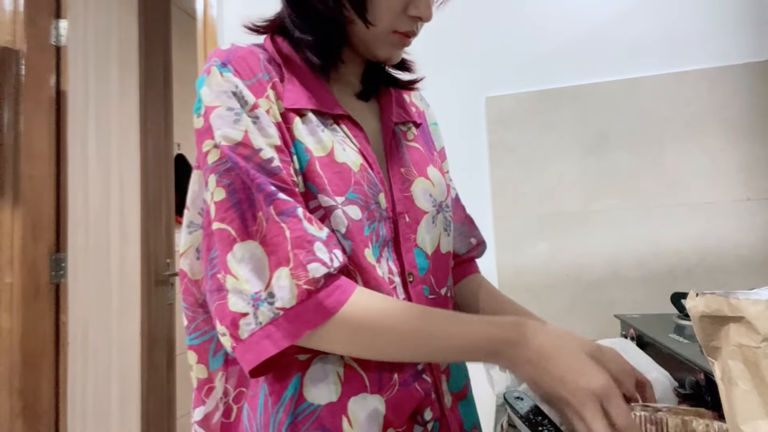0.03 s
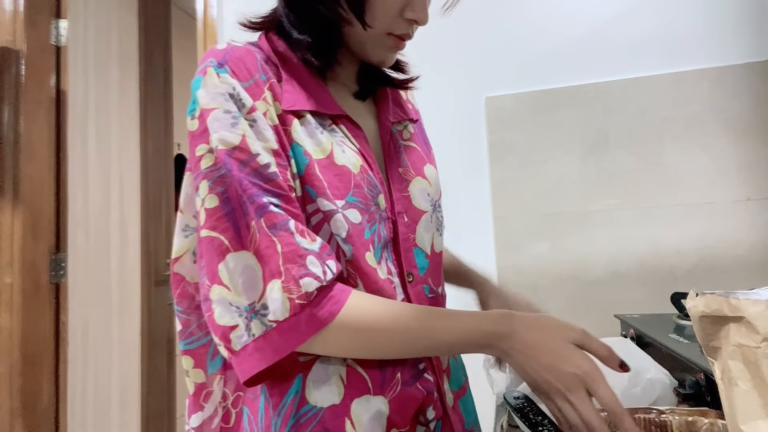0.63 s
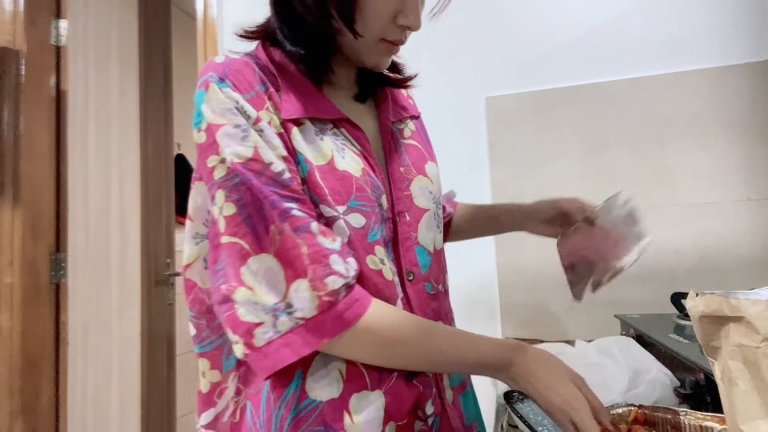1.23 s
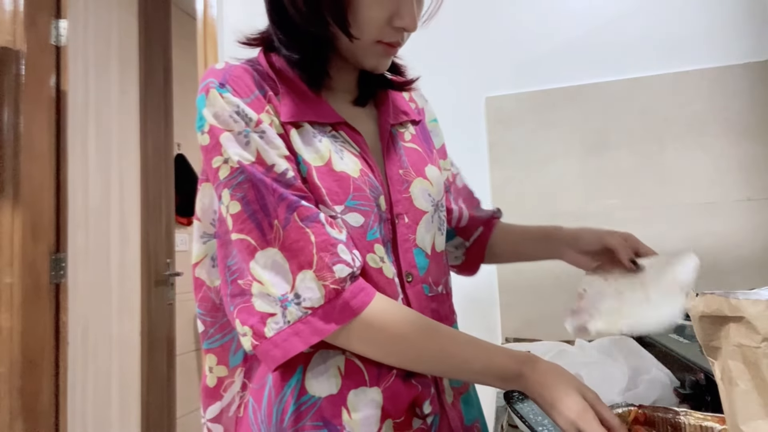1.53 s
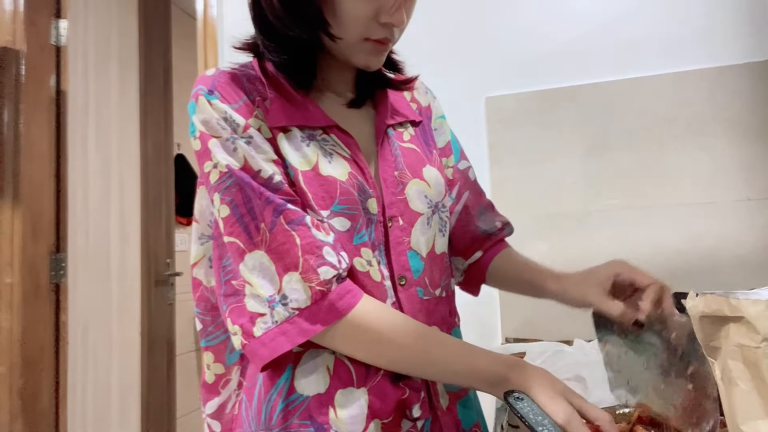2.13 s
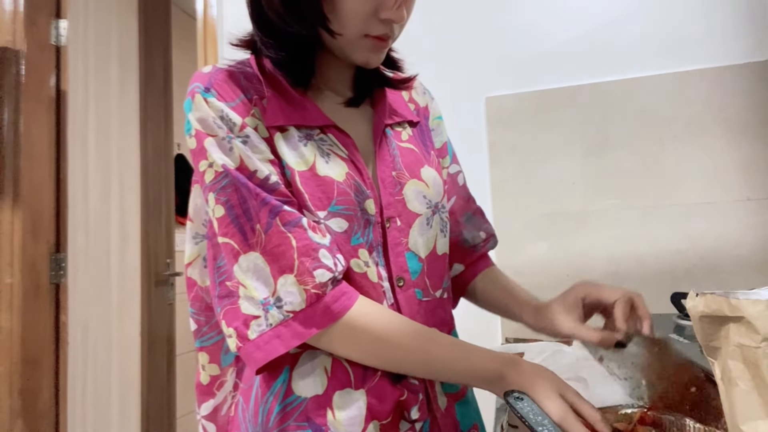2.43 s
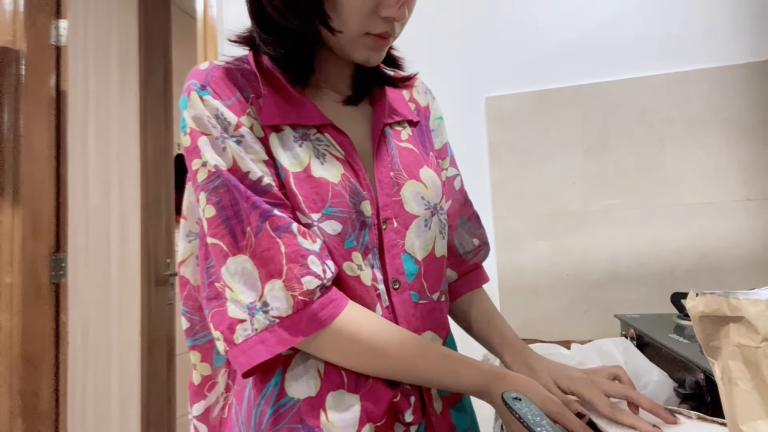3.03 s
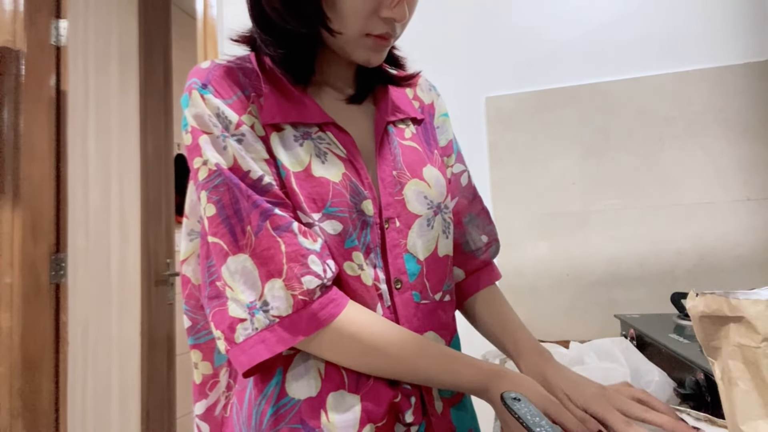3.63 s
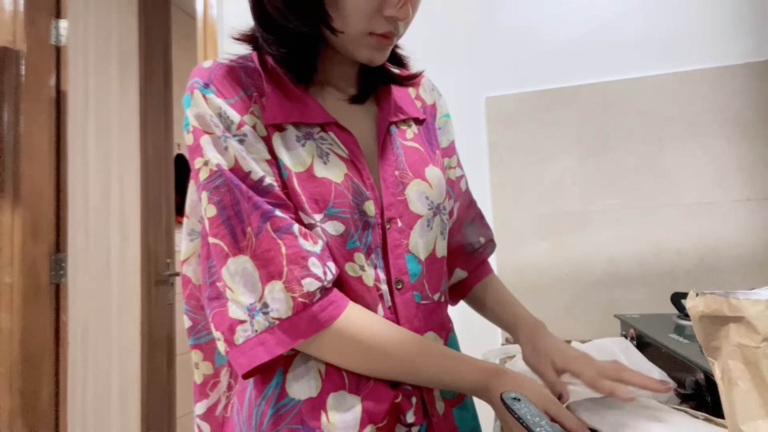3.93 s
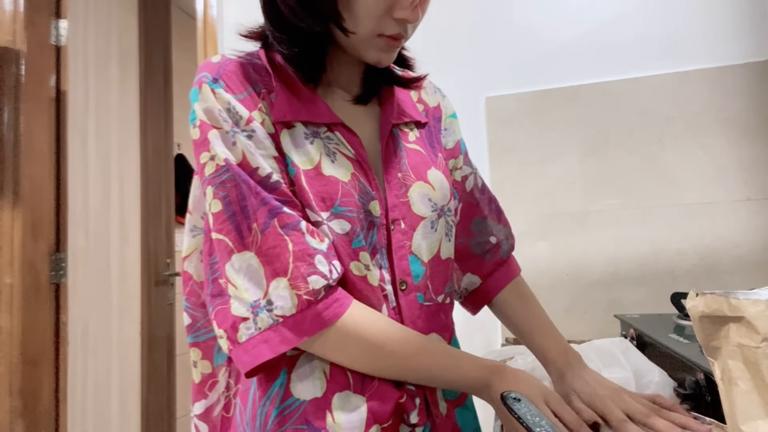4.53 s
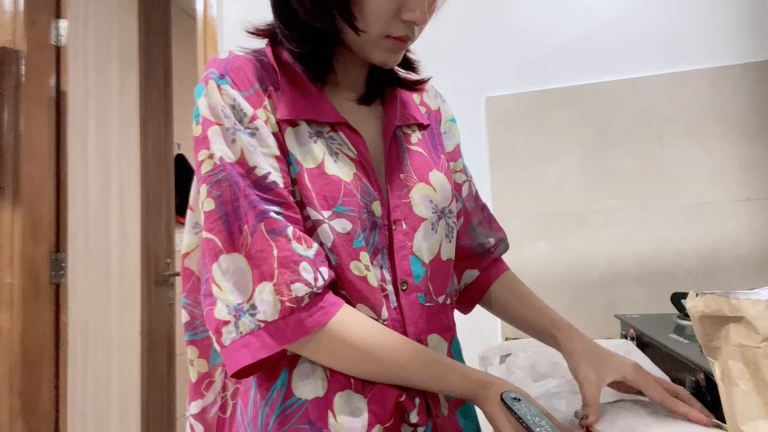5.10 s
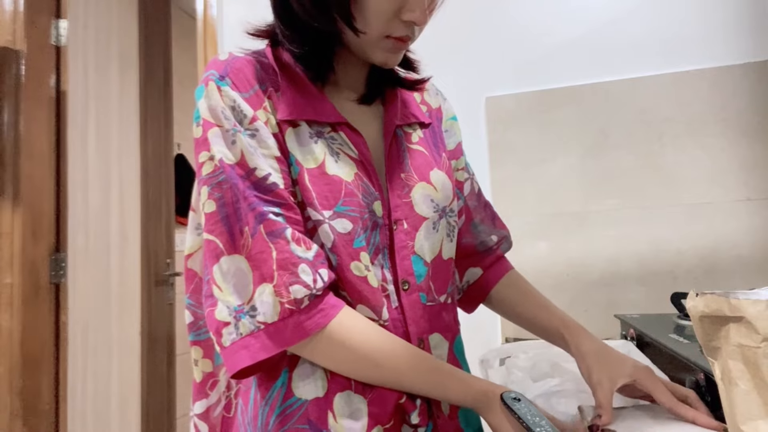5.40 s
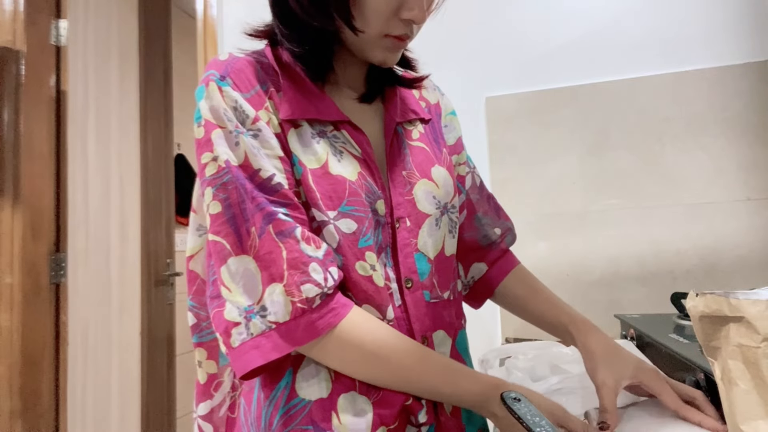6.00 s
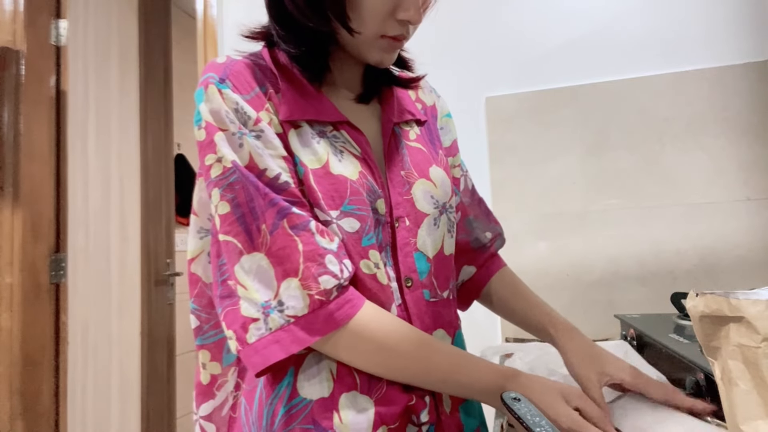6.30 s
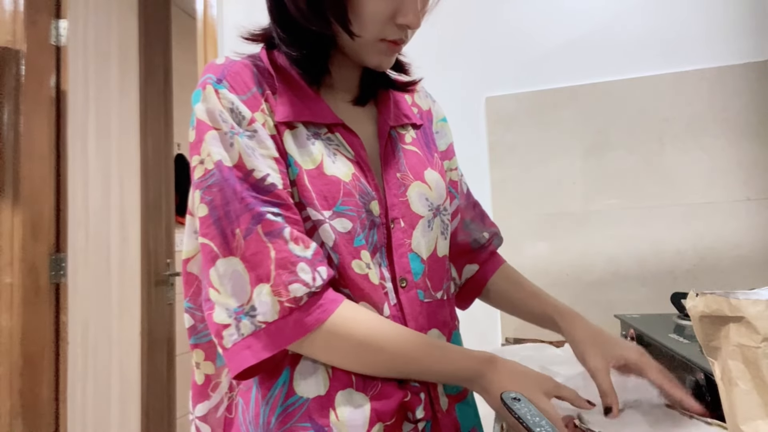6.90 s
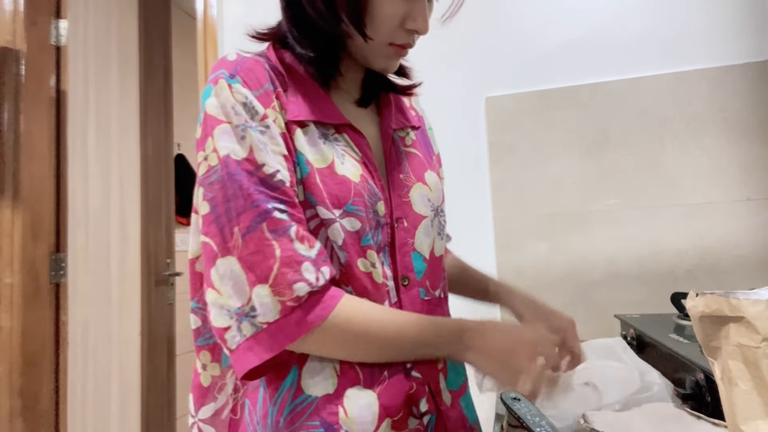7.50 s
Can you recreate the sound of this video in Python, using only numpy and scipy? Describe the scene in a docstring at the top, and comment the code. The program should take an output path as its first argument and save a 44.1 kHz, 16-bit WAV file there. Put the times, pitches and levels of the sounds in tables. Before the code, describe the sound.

In a small kitchen, an appliance motor hums faintly while someone covers a foil food tray nearby. First comes a light crackle of plastic being pulled, then a quieter stretch of faint ticks. The foil starts to snap and crackle under the fingers, the rim folds and creaks briefly, and the hollow tray pops and bumps the counter. One more plastic rustle swells at the close.

```python
"""An aluminium foil tray snaps, pops and knocks on the counter as someone presses a plastic sheet onto it.
First the sheet is peeled off its wrapping, and its tiny creases flip with a crinkle. Under the fingers
small patches of foil buckle in bursts of clicks, the rim folds and creaks, and the hollow tray rings.
The small kitchen echoes briefly, and an appliance's motor hums and whines faintly underneath."""
import sys
import numpy as np
from scipy import signal
from scipy.fft import rfft, irfft
from scipy.io import wavfile
from scipy.ndimage import uniform_filter1d

SR = 44100
rng = np.random.default_rng(int(sys.argv[2]) if len(sys.argv) > 2 else 0)


def generate_wav(sig):
    """Save sig (samples, or channels by samples) to the path in sys.argv[1] as 16-bit PCM at SR."""
    pcm = np.round(np.clip(np.atleast_2d(sig).T, -1, 1) * 32767).astype(np.int16)
    wavfile.write(sys.argv[1], SR, pcm)


N = 341775
TIME = np.arange(N) / SR

# Event levels are set before each source's own gain. A "colour" is how strong each pitch is in a sound.
# small patches of foil buckling: time_s, level_db, pitch_hz
SNAPS = [(0.2701, -13.5, 9900), (1.568, -35, 6300), (2.9237, -12, 8700), (3.3802, -8.5, 14000),
         (4.053, -24.5, 8200), (4.5062, -13, 7350), (4.574, -19, 9100), (4.9523, -15, 6800),
         (5.1432, -21.5, 7150), (5.445, -22, 8400), (5.855, -19.5, 6800), (6.4112, -20.5, 9000),
         (6.679, -23.5, 7600), (6.7212, -19, 8800), (6.872, -19, 7250), (7.3416, -13.5, 7700)]
# the rim folding over: time_s, level_db, pitch_hz
FOLDS = [(1.709, -28.5, 4270), (3.366, -14.5, 3600), (4.2435, -20.5, 4460), (4.299, -22, 3860),
         (4.3454, -22.5, 3480), (6.2698, -26.5, 3740)]
# the tray bumping the counter or being tapped: start_s, ring_db, centre_hz, centre_boost_db, crack_db
KNOCKS = [(0.144, -34, 1800, 17, -38), (.403, -34.5, 1400, 8, -27.5), (3.156, -21.5, 806, 3.5, -24),
          (3.3811, -9.5, 1000, 1.5, -9), (3.7958, -22.5, 520, 11.5, -26), (4.339, -25.5, 334, 4, -43),
          (4.711, -28.5, 430, 10, -26), (5.277, -37, 1200, 1, -26.5), (5.334, -36.5, 330, 0, -30),
          (6.195, -30.5, 1710, 4, -22), (6.271, -29, 1110, 11, -48), (6.399, -27.5, 342, 10, -42),
          (6.4598, -13, 370, 4, -13.5), (6.892, -32.5, 880, 7, -28), (7.049, -34, 1270, 4, -30)]
# the tones the tray rings with: pitch_hz, level_db, ring_s (time to fade by 60 dB)
TRAY_TONES = [(188, -8, 0.044), (290, -3, 0.034), (347.6, -6, 0.055), (477, -11.5, 0.047),
              (616, -3.5, 0.066), (692, -7, 0.053), (828, -6, 0.023), (984, -2, 0.041), (1130, 3, 0.028),
              (1279, 2.5, 0.041), (1710, -2, 0.028)]
# the tray's floor flipping through: time_s, level_db, pitch_hz, rise_s, fade_s
POPS = [(3.385, -14, 1051, 0.00048, 0.0023), (6.466, -10, 663, 0.0015, .0018)]
# the rim scraping under pressure: start_s, length_s, level_db
CREAKS = [(4.162, 0.059, -45), (4.285, 0.041, -36)]
# pulls on the plastic sheet: start_s, length_s, level_db, swell_db_per_s
PULLS = [(-.02, 0.062, -39, -10), (0.343, 0.021, -43.5, -4), (0.673, 0.076, -37.5, 0),
         (0.772, 0.3, -39, 10), (1.157, 0.034, -40.5, 0), (7.47, 0.38, -37, 31)]
# large creases of the plastic flipping: start_s, level_db
CREASES = [(.685, -39), (.7907, -26), (0.936, -29), (.964, -26), (2.152, -48), (3.989, -33), (7.488, -22),
           (1.01, -26), (1.08, -24), (4.283, -30), (7.653, -22)]
# fingers pressing the sheet onto the tray: start_s, length_s, crinkle_db, rub_db, rub_centre_hz
PRESSES = [(0.347, 0.058, -34.5, -42, 1200), (1.82, 0.14, -49, -61, 1200), (2.209, 0.042, -40.5, -55, 1200),
           (2.396, 0.23, -47.5, -74, 985), (2.547, 0.1, -38, -50, 1080), (2.727, 0.11, -39, -43.5, 1300),
           (2.86, 0.17, -41, -46, 1170), (3.178, 0.56, -43.5, -47.5, 880), (3.344, 0.054, -21, -39.5, 1300),
           (3.863, 0.4, -43.5, -60, 800), (4.142, 0.097, -42, -45.5, 1210), (4.258, 0.1, -42, -40, 1080),
           (4.353, 0.3, -45, -57, 700), (4.643, 0.13, -38, -45, 483), (4.854, 0.24, -35.5, -51.5, 664),
           (5.092, 0.15, -37, -46.5, 720), (5.415, 0.079, -37.5, -46.5, 615),
           (5.843, 0.23, -42.5, -46, 700), (6.282, 0.18, -36, -50.5, 760), (6.722, 0.087, -36.5, -62, 900),
           (6.98, 0.14, -45, -49.5, 1530)]
# colour of cracking foil: pitch_hz, level_db
FOIL_COLOUR = [(300, -24), (1200, -9), (2700, -14.5), (3900, -9), (5400, -11), (8400, 0.5), (10500, -3),
               (12400, -7), (14800, -1), (17000, -29)]
# colour of the creaking rim: pitch_hz, level_db
CREAK_COLOUR = [(600, -10), (1800, -6), (2900, -3), (3900, 10), (5500, -5), (12000, -21)]
# colour of crinkling plastic: pitch_hz, level_db
PLASTIC_COLOUR = [(200, -18), (700, -7.5), (1400, -11), (3200, -10.5), (5400, -6), (7000, -1.5),
                  (8700, 3.5), (11000, -1.5), (12200, -7), (14200, 4), (17000, -5)]
# colour of the hollow tray when it is rubbed or rattles: pitch_hz, level_db
TRAY_COLOUR = [(120, -36.5), (300, 4), (650, 5), (850, -4), (1280, 6), (1600, -4), (2300, -1), (2900, -7),
               (3900, -4), (6000, -7), (12000, -60)]
# colour of the rushing air: pitch_hz, level_db
AIR_COLOUR = [(20, -18), (33, -23), (47, -3), (70, -10), (110, -1.5), (170, -9), (400, -12), (550, -19),
              (1100, -21.5), (1700, -27.5), (5500, -33), (8800, -25.5), (12200, -33.5), (14500, -29)]
# the motor's strong tones: multiple_of_motor_rate, level_db
HUM_TONES = [(1, -59), (4, -59), (12, -68), (38, -72), (52, -71), (54, -66.5), (60, -74), (81, -66.5)]
# the changing level of the deep hum at twice the motor rate: time_s, level_db
DEEP_HUM = [(0.0, -50), (1.01, -45.5), (1.64, -50), (1.68, -82), (1.96, -52), (2.68, -44.5), (3.84, -53),
            (4.25, -45.5), (5.03, -51.5), (5.29, -47), (7.75, -47)]
# bands where the appliance's casing buzzes with weak tones: centre_hz, width_octaves, level_db
WHINE_BANDS = [(2670, 0.036, -72.5), (4190, 0.12, -74.5)]
# the kitchen's echo: pitch_hz, ring_s (time to fade by 60 dB)
ROOM_ECHO = [(150, 0.32), (2500, 0.37), (16000, 0.25)]


def foil_snaps(gain_db=-9, lead_db=-38, lead_s=0.014, burst_s=0.018, rebound_s=0.003, rebound_db=2.5):
    """Buckling foil creaks, gives way in a burst of clicks and cracks again as it springs back."""
    out, t = np.zeros(N), np.arange(-2048, 2048) / SR
    strain = np.where(t < 0, amp(lead_db) * np.exp(-abs(t) / lead_s), amp(-60 * abs(t) / burst_s))
    strain += (t > rebound_s) * amp(rebound_db - 60 * abs(t - rebound_s) / burst_s)

    def buckle(s, db, **tone):
        add(out, s + t[0], amp(db + gain_db) * crack(FOIL_COLOUR, strain, **tone))

    for s, db, hz in SNAPS:
        bright_hz = 8900 * 2 ** (0.2 * (db + 20))  # a harder snap is brighter
        buckle(s, db, centre_hz=bright_hz, boost_db=11, ping_hz=hz, ping_db=5)
    for s, db, hz in FOLDS:
        buckle(s, db, centre_hz=4130, boost_db=8, ping_hz=hz, ping_db=10.5)
    for s, *_, db in KNOCKS:  # a knock also cracks the rim, which pings faintly
        buckle(s, db, centre_hz=3430, boost_db=0, ping_hz=3430, ping_db=4.5)
    return out


def tray_knocks(gain_db=-8, octaves=0.81, rattle_s=0.043, rise_s=0.0035):
    """A knock or a fold rings the tray, muffled by the food in it; the rim rattles briefly."""
    out, t = np.zeros(N), np.arange(SR // 5) / SR
    tone_hz, tone_db, ring_s = np.transpose(TRAY_TONES)[:, :, None]
    fold_blows = [(s, db - 13, 1170, 8) for s, db, _ in FOLDS]  # a fold rings it only a little
    for s, db, centre_hz, boost_db, *_ in KNOCKS + fold_blows:
        phase, bend = rng.random((2, len(TRAY_TONES), 1))
        bent_hz = tone_hz * (1 + 0.084 * (bend - .5))  # the grip bends the thin walls
        waves = np.sin(2 * np.pi * (bent_hz * t + phase))
        ring = (waves * amp(tone_db + boost_db * bell(tone_hz, centre_hz, octaves) - 60 * t / ring_s)).sum(0)
        rim_clicks = clicks(len(t), per_s=6000, spread_db=1.1) * amp(-60 * t / rattle_s)
        rattle = coloured(rim_clicks, TRAY_COLOUR, boost(boost_db, centre_hz, octaves))
        blow = (peaked(ring) + peaked(rattle)) * (1 - np.exp(-t / rise_s))
        add(out, s, amp(db + gain_db) * peaked(blow))
    return out


def tray_pops(sag_octaves_per_s=25):
    """The tray's floor flips with a hollow pop; its pitch sags as the tension goes."""
    out, t = np.zeros(N), np.arange(-1024, 1024) / SR
    for s, db, hz, rise_s, fade_s in POPS:
        pitch_hz = hz * 2 ** (-sag_octaves_per_s * t)
        swing = np.sin(2 * np.pi * np.cumsum(pitch_hz) / SR)
        loudness = np.exp(-abs(t) / np.where(t < 0, rise_s, fade_s))
        add(out, s + t[0], amp(db) * swing * loudness)
    return out


def rim_creaks():
    """Pressed hard, the rim sticks and slips with a nasal scrape."""
    slips = rustle(CREAK_COLOUR, per_s=2300, spread_db=3, clump_db=5, clump_hz=70,
                   low_hz=2000, high_hz=4500)
    return sum(amp(db) * pressure(s, length) for s, length, db in CREAKS) * slips


def sheet_peeling(fizz_db=0.5, pings_db=-8):
    """Pulled plastic gives a bright fizz of creases and pings, louder the tighter the pull."""
    pull = np.zeros(N)
    for s, length, db, db_per_s in PULLS:
        swell_db = db_per_s * np.clip(TIME - s, 0, length)
        pull += amp(db + swell_db) * held(s, length, rise_s=0.012, fade_s=0.047)
    fizz = rustle(PLASTIC_COLOUR, per_s=3200, spread_db=-1, clump_db=2.5, clump_hz=35)
    return pull * (amp(fizz_db) * fizz + amp(pings_db) * sheet_pings())


def sheet_pings(ring_s=0.006, low_hz=1500, high_hz=12000, count=28):
    """Small tight patches of plastic ring briefly, each at its own pitch."""
    out, t = np.zeros(N), np.arange(1024) / SR
    pitches = low_hz * (high_hz / low_hz) ** ((np.arange(count) + rng.random(count)) / count)
    rings = np.sin(2 * np.pi * pitches[:, None] * t) * amp(-60 * t / ring_s)
    flips = clicks(N, per_s=450, spread_db=3)
    patch = rng.integers(0, count, N)
    for at in np.flatnonzero(flips):
        add(out, at / SR, flips[at] * rings[patch[at]])
    return unit(coloured(out, PLASTIC_COLOUR))


def sheet_creases(gain_db=-5, burst_s=0.043):
    """The larger creases of the plastic flip one by one, each at its own pitch."""
    out, strain = np.zeros(N), amp(-60 * np.arange(2048) / SR / burst_s)
    for s, db in CREASES:
        hz = rng.uniform(3500, 10500)
        flip = crack(PLASTIC_COLOUR, strain, centre_hz=hz, boost_db=3, ping_hz=hz, ping_db=5)
        add(out, s, amp(db + gain_db) * flip)
    return out


def crinkle(hold_from_s=2.9, hold_db=-68, settle_db=-25.5):
    """Sheet and foil crackle under each press, as they settle after a snap, and faintly while held."""
    power = amp(hold_db) ** 2 * (TIME > hold_from_s)
    power += sum((amp(db) * pressure(s, length)) ** 2 for s, length, db, *_ in PRESSES)
    for s, db, _ in SNAPS:
        power += (amp(db + settle_db) * held(s, length_s=0.026, rise_s=0.026, fade_s=0.027)) ** 2
    return np.sqrt(power) * rustle(PLASTIC_COLOUR, per_s=2000, spread_db=0.5, clump_db=5, clump_hz=30)


def finger_rubs(boost_db=9, octaves=0.54):
    """Small slips of the fingers sound through the hollow tray; the spot pressed sets their pitch."""
    slips = rustle(TRAY_COLOUR, per_s=2200, spread_db=2, clump_db=7, clump_hz=48, low_hz=317, high_hz=1200)
    out = np.zeros(N)
    for s, length, _, db, centre_hz in PRESSES:
        part = slice(round(s * SR), round((s + length) * SR))
        spectrum = rfft(slips[part])
        hz = np.linspace(0, SR / 2, len(spectrum))
        rub = irfft(spectrum * amp(boost_db * bell(hz, centre_hz, octaves)), len(slips[part]))
        add(out, s, amp(db) * pressure(s, length)[part] * unit(rub))
    return out


def sheet_ticks(start_s=1.4, per_s=34, gain_db=-46.5, tick_s=0.022, count=8):
    """Single creases flip at random with faint ticks while the sheet is handled."""
    out, t = np.zeros(N), np.arange(2048) / SR
    for centre_hz in np.geomspace(6500, 11500, count):
        burst = clicks(len(t), per_s=10000, spread_db=5.2) * amp(-60 * t / tick_s)
        tick = coloured(burst, PLASTIC_COLOUR, boost(8, centre_hz, octaves=0.81))
        flips = clicks(N, per_s / count, spread_db=1.5) * (TIME > start_s)
        out += signal.oaconvolve(flips, peaked(tick))[:N]
    return amp(gain_db) * out


def kitchen(sound, echo_db, gap_s=0.0023):
    """Adds the dense echo of tiled walls; low and high pitches die away at their own speeds."""
    bounces = rng.standard_normal(SR // 2) * (rng.random(SR // 2) < 5000 / SR)
    hz, t, bands = signal.stft(bounces, SR, nperseg=256)
    fade = amp(-60 * t / look_up(ROOM_ECHO, hz)[:, None])
    echo = signal.istft(bands * fade, SR, nperseg=256)[1]
    echo *= np.clip(np.arange(len(echo)) / SR / gap_s - 1, 0, 1)  # fades in after a short gap
    return sound + amp(echo_db) * signal.oaconvolve(sound, echo / np.linalg.norm(echo))[:N]


def appliance(motor_hz=49.055, waver_hz=0.035, air_db=-45.5):
    """A motor hums and buzzes at whole multiples of its turning rate, over a soft rush of air."""
    air_gain = amp(look_up(AIR_COLOUR, np.fft.rfftfreq(N, 1 / SR)))
    air_level = amp(air_db + 0.7 * drift(6))
    air = air_level * unit(irfft(rfft(rng.standard_normal(N)) * air_gain, N))
    angle = 2 * np.pi * np.cumsum(motor_hz + waver_hz * drift(4.9)) / SR
    hum = [(k, amp(db + drift(12))) for k, db in HUM_TONES]
    hum.append((2, amp(np.interp(TIME, *np.transpose(DEEP_HUM)))))
    whine = [(k, sum(amp(db) * bell(k * motor_hz, hz, width) for hz, width, db in WHINE_BANDS))
             for k in [*range(51, 58), *range(77, 94)] if k not in dict(HUM_TONES)]
    motor = sum(gain * np.sin(k * angle + 2 * np.pi * rng.random()) for k, gain in hum + whine)
    return air + np.sqrt(2) * motor


def crack(colour, strain, centre_hz, boost_db, ping_hz, ping_db):
    """A burst of clicks as loud as the strain, with a broad boost and one narrow ringing pitch."""
    extra_db = boost(boost_db, centre_hz, octaves=1) + boost(ping_db, ping_hz, octaves=0.073)
    burst = clicks(len(strain), per_s=13000, spread_db=3.1) * strain
    return peaked(coloured(burst, colour, extra_db))


def rustle(colour, per_s, spread_db, clump_db, clump_hz, low_hz=3000, high_hz=15000, count=6):
    """Clumps of clicks, shared among creases that each favour their own pitch."""
    clumps = amp(clump_db * np.clip(drift(clump_hz), -2, 2))
    crackle = np.zeros(N)
    for centre_hz in np.geomspace(low_hz, high_hz, count):
        flips = clicks(N, per_s / count, spread_db) * clumps
        crackle += coloured(flips, colour, boost(6, centre_hz, octaves=0.23))
    # even out the level, so random clumps do not make one stroke louder than another
    power = uniform_filter1d(uniform_filter1d(crackle ** 2, 4096), 2048)
    return crackle / np.sqrt(abs(power) + 1e-12)


def clicks(n, per_s, spread_db):
    """Tiny clicks at random times; spread_db sets how much their sizes vary."""
    sizes = amp(spread_db * np.minimum(rng.exponential(1, n), 4)) * rng.choice([-1, 1], n)
    return sizes * (rng.random(n) < per_s / SR)


def pressure(start_s, length_s, skew=0.83, roundness=0.71):
    """One press of the fingers, from 0 to 1 and back; a skew under 1 brings the top earlier."""
    along = np.clip((TIME - start_s) / length_s, 0, 1)
    return np.sin(np.pi * along ** skew) ** roundness * (along < 1)


def held(start_s, length_s, rise_s, fade_s):
    """A level that rises to 1, stays there and fades away."""
    rise = np.clip((TIME - start_s) / rise_s, 0, 1)
    return rise * np.exp(-np.clip((TIME - start_s - length_s) / fade_s, 0, 20))


def drift(rate_hz):
    """A smooth random wobble that changes about rate_hz times a second."""
    hz = np.fft.rfftfreq(N, 1 / SR)
    return unit(irfft(rfft(rng.standard_normal(N)) * np.exp(-(hz / rate_hz) ** 2), N))


def coloured(sound, colour, extra_db=0):
    """Gives a sound a colour, using a filter that rings only after each click."""
    log_gain = np.log(amp(look_up(colour, np.fft.rfftfreq(2048, 1 / SR)) + extra_db))
    mirrored = np.concatenate([log_gain, log_gain[-2:0:-1]])
    ring = np.fft.ifft(np.exp(np.conj(signal.hilbert(mirrored)))).real
    return signal.oaconvolve(sound, ring)[:len(sound)]


def boost(db, centre_hz, octaves):
    """Extra decibels around one pitch, to pass to coloured()."""
    return db * bell(np.fft.rfftfreq(2048, 1 / SR), centre_hz, octaves)


def bell(hz, centre_hz, octaves):
    """A bell curve of height 1 around one pitch."""
    return np.exp(-.5 * (np.log2((hz + 1) / centre_hz) / octaves) ** 2)


def look_up(table, hz):
    """Reads between a table's rows, with octaves evenly spaced."""
    row_hz, values = np.transpose(table)
    return np.interp(np.log(hz + 1), np.log(row_hz + 1), values)


def peaked(sound):
    """Scales the loudest hundredth of a second to an average (rms) level of 1."""
    return sound / np.sqrt(uniform_filter1d(sound ** 2, 400).max() + 1e-20)


def unit(sound):
    """Scales to an average (rms) level of 1."""
    return sound / np.sqrt(np.mean(sound ** 2) + 1e-20)


def amp(db):
    """Turns decibels into a gain."""
    return 10 ** (np.asarray(db) / 20)


def add(mix, start_s, sound):
    """Mixes a sound in at start_s."""
    part = mix[max(round(start_s * SR), 0):][:len(sound)]
    part += sound[:len(part)]


def scene():
    """Tray and sheet in the kitchen, over the appliance, in one channel."""
    bright = foil_snaps() + sheet_peeling() + sheet_creases() + crinkle() + sheet_ticks() + rim_creaks()
    bright = kitchen(bright, echo_db=-5)
    hollow = kitchen(tray_knocks() + tray_pops() + finger_rubs(), echo_db=-7)
    return (bright + hollow + appliance())[None]


def record(dry, ceiling=0.9, top_hz=15900):
    """Rounds off the very loudest peaks, then cuts the highest treble."""
    rounded = ceiling * np.tanh(dry / ceiling)
    treble_cut = signal.firwin(401, top_hz, window=("kaiser", 7), fs=SR)
    return signal.oaconvolve(rounded, treble_cut[None], "same")


dry = scene()
out = record(dry)
generate_wav(out)
```